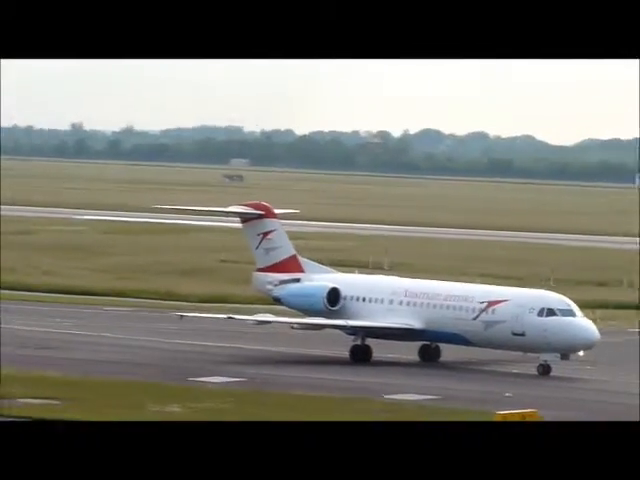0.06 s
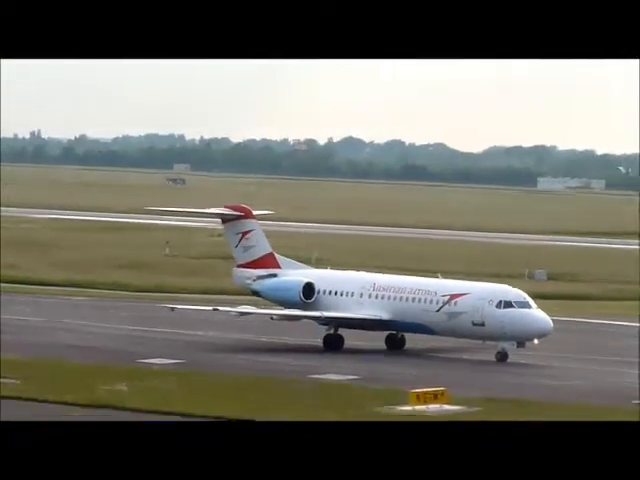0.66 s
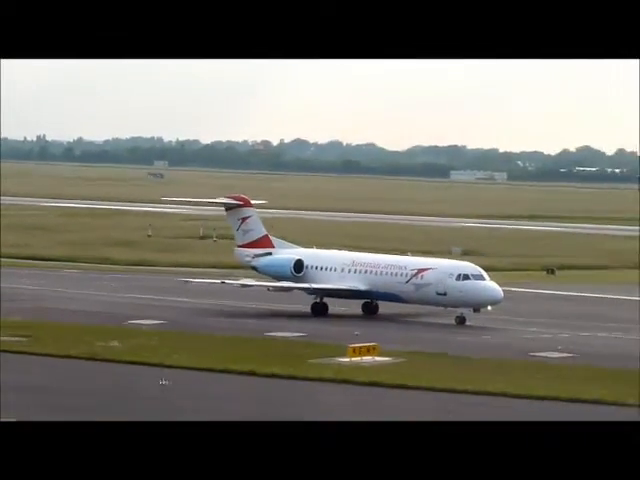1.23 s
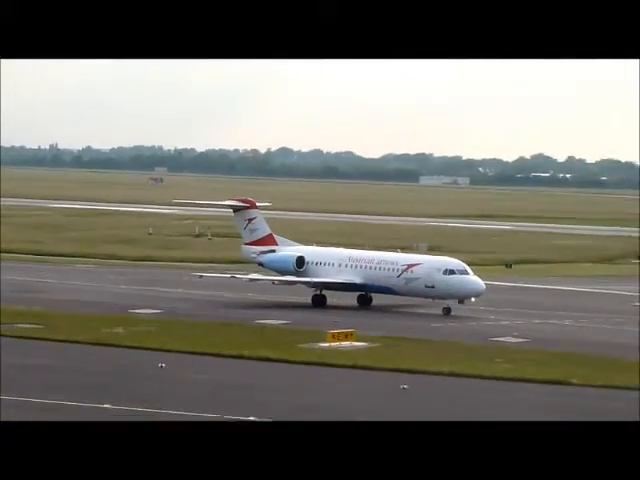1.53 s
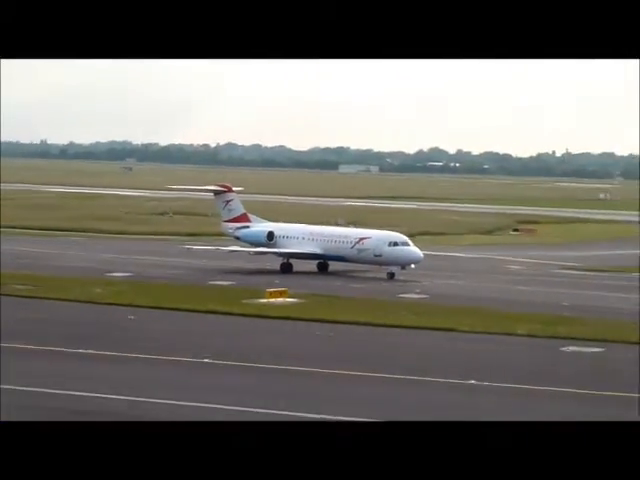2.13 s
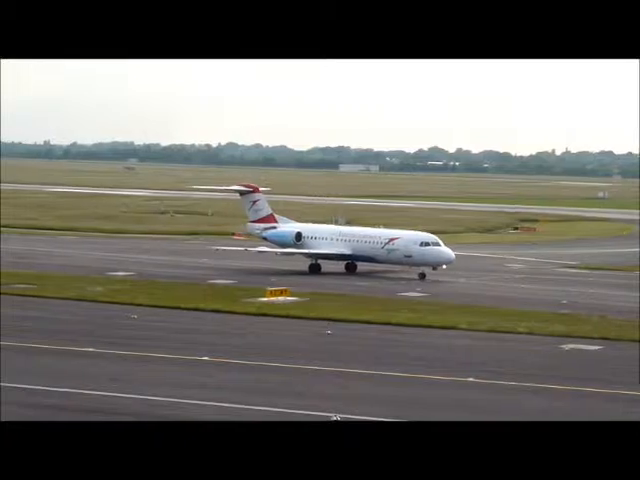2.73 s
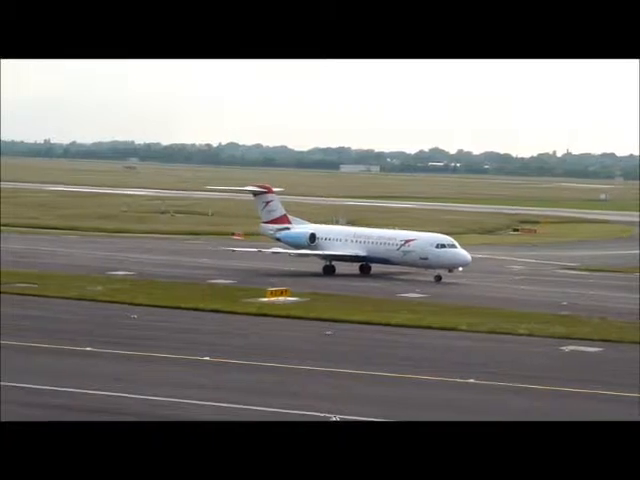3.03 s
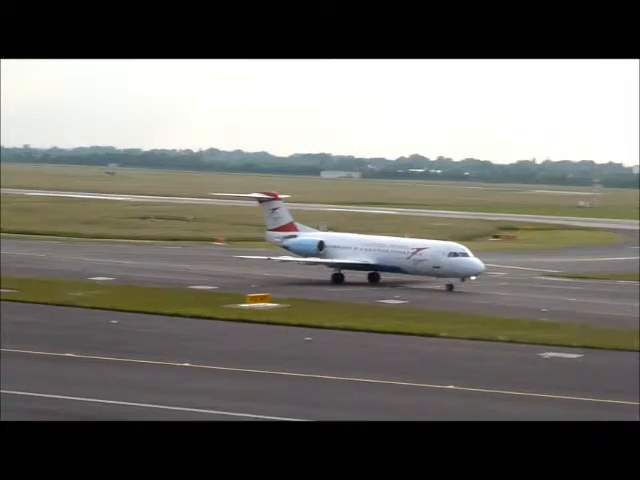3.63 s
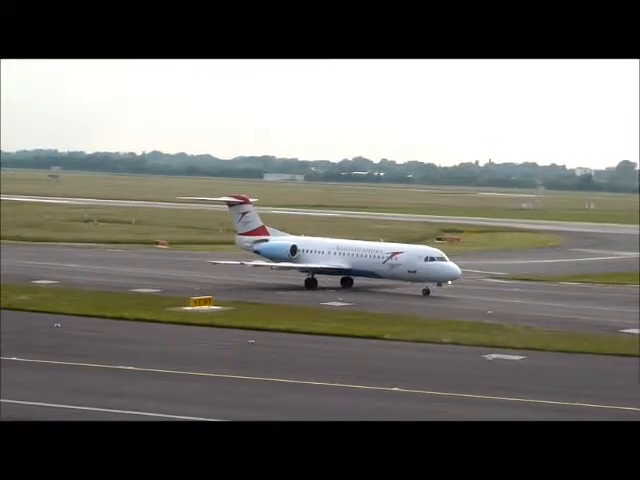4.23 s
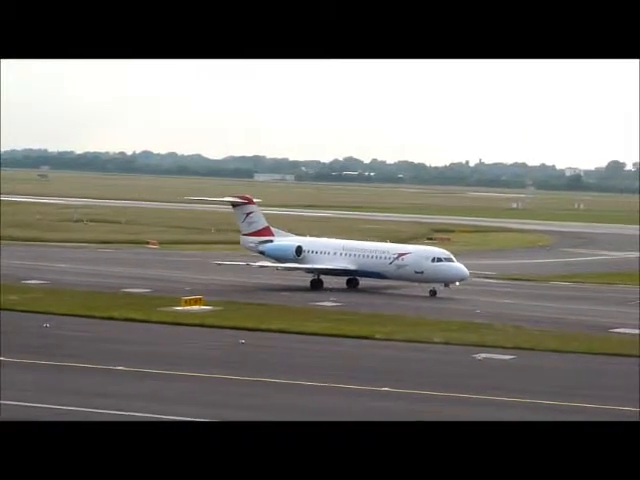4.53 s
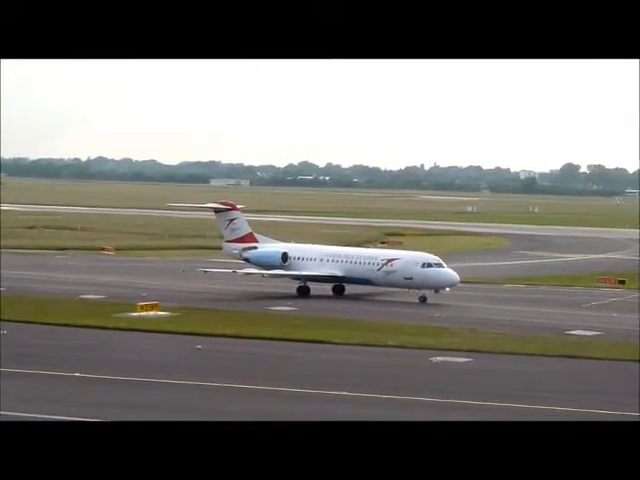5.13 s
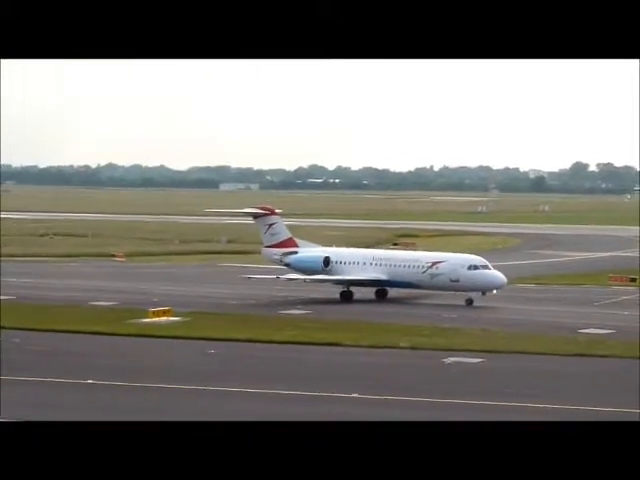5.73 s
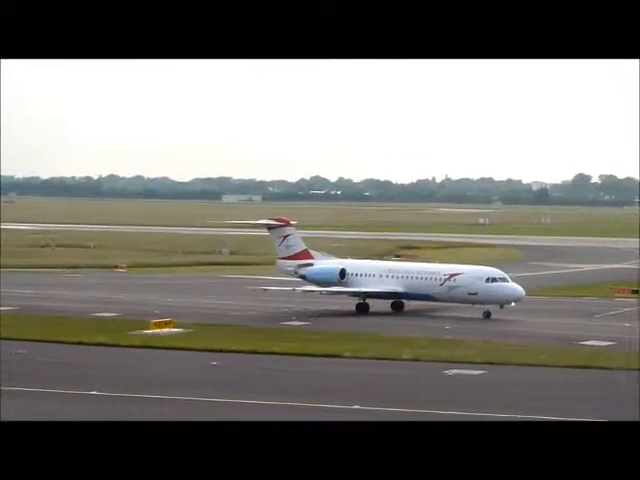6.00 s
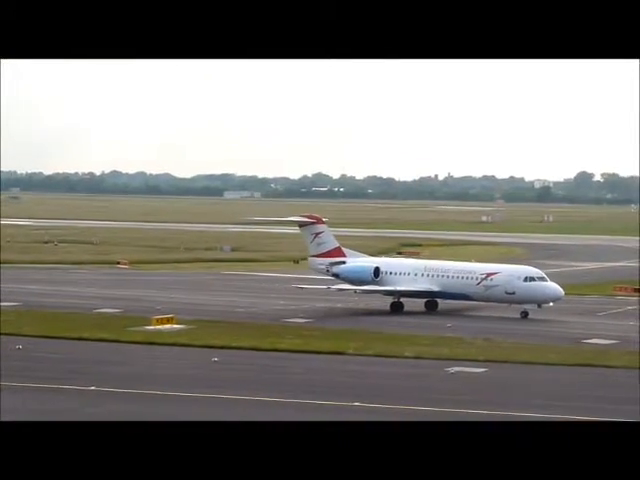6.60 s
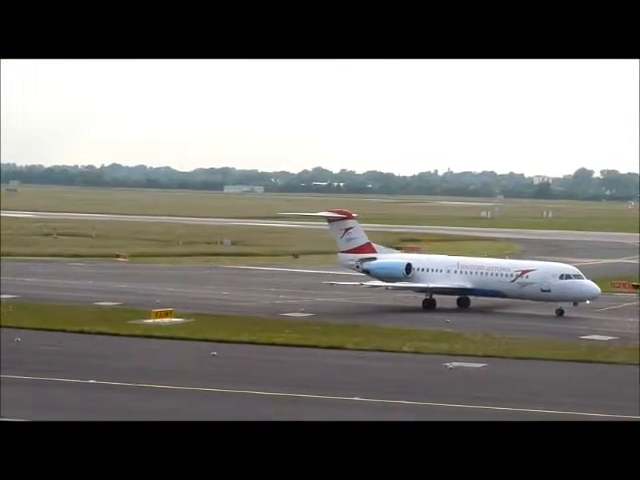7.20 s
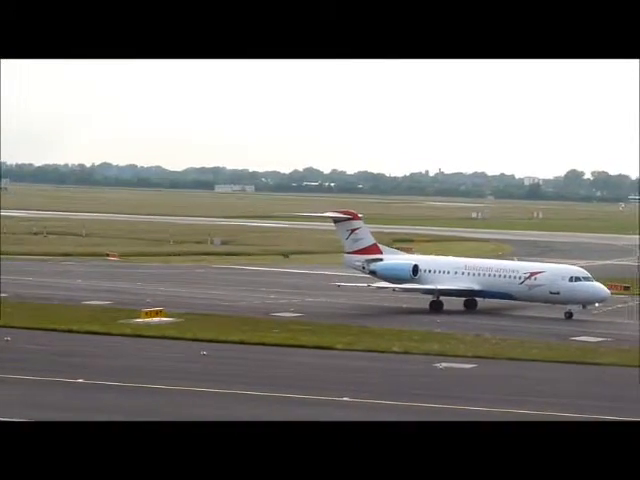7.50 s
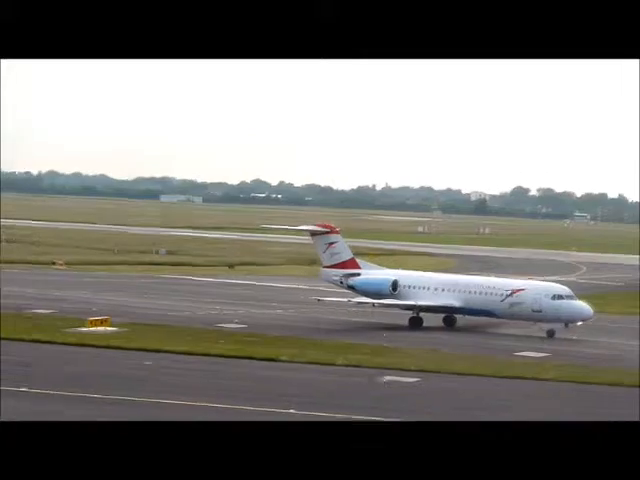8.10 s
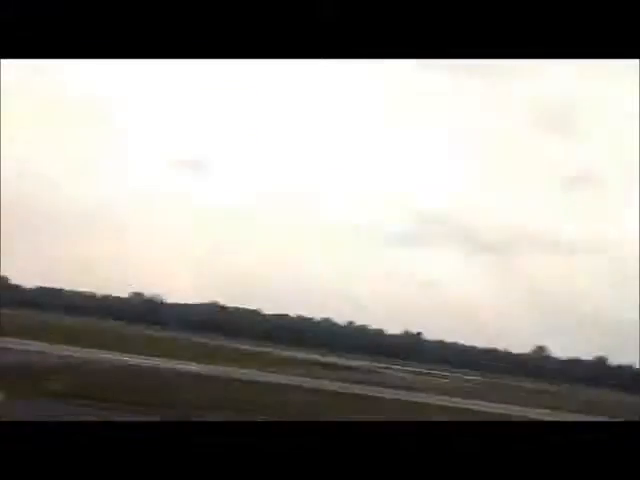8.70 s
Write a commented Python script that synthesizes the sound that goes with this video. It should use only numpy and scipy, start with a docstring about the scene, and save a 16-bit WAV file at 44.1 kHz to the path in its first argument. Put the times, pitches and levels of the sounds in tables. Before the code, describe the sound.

A jet airliner taxis past with a high engine whine and a growing roar over deep rumble, while wind buffets the microphone.

```python
"""A twin-jet airliner taxis past on an open airfield. Its fans whine, sag and slowly spool up,
its compressors whistle, and the exhaust roar grows over a deep rumble as the engines turn towards
the listener. Moving air makes the tones flicker, a reflection combs the roar, and gusts of wind
thump on the microphone."""
import sys
import numpy as np
from scipy import signal
from scipy.fft import rfft, irfft, next_fast_len
from scipy.io import wavfile
from scipy.ndimage import uniform_filter1d, map_coordinates

SR = 44100
rng = np.random.default_rng(int(sys.argv[2]) if len(sys.argv) > 2 else 0)


def to_wav(sig):
    """Store sig (one row per channel, or 1-D mono) as 16-bit WAV at the path in sys.argv[1].

    Samples outside -1..1 are clipped; the rate is SR.
    """
    pcm = np.clip(np.atleast_2d(sig), -1, 1) * 32767
    pcm = np.round(pcm).astype(np.int16)
    wavfile.write(sys.argv[1], SR, pcm.T)  # frames by channels


N = 385875

# the exhaust builds as the engines turn: (time [s], relative level [dB])
ROAR_RIDE = [(0, -36.5), (0.35, -34.5), (1.0, -38), (1.4, -35), (2.5, -31.5), (3.1, -32.5), (4.15, -27.5),
             (4.6, -29.5), (6.8, -30), (8.25, -29), (8.75, -31)]
# the treble swells and sinks through moving air; each layer scales this ride: (time [s], gain [dB])
TREBLE_RIDE = [(0, -2.5), (0.35, -1), (0.97, -9), (1.45, -3.5), (2.5, -1), (2.88, 0.5), (3.1, -2),
               (4.2, 3.5), (4.58, 1.7), (4.85, 4), (5.05, 0), (5.4, 0.5), (5.65, 4), (5.87, -1.5),
               (6.15, -1.5), (6.42, 4.5), (6.78, 0.5), (7.1, 2), (7.7, 0.5), (8.17, 3), (8.75, -1.5)]
HUM_RATIO = 0.3493  # pitch of the fan's low hum over its main tone


def fan():
    """The fan whine: all tones glide with the shaft, each loudest as its beam points at the listener."""
    # upper shaft tones, each with its own lobe:
    # (pitch [x main tone], relative level [dB], lobe centre [s], lobe half-width [s], lobe gain [dB])
    overtones = [(1.1449, -48, 5.5, 2.0, 4.5), (1.3493, -41, 7.2, 1.1, 7), (1.4931, -47, 7.1, 3.6, 11.5),
                 (1.5745, -42, 6.9, 1.0, 8), (1.9242, -46.5, 7.3, 1.6, 11), (2.3512, -45, 6.6, 0.4, 11.5)]
    hz = fan_pitch()
    treble_db, = curves(TREBLE_RIDE)
    past_beam_s = np.arange(N) / SR - 5.45
    beam_db = -26.5 + np.minimum(4.5 * past_beam_s, -3.5 * past_beam_s)  # sweeps in, falls away slower
    stray_db = -43.5 + 1.1 * treble_db  # what is heard outside the beam
    level = np.hypot(amp(beam_db), amp(stray_db))
    whine = level * flaring(hz) * tone(hz, flicker_db=1.26, smear=0.12)
    for ratio, db, centre, width, lobe_db in overtones:
        level = amp(db + 0.35 + lobe_db * swell(centre, width) + 1.15 * treble_db)
        path = flaring(hz * ratio) * fading(depth=0.35, rate=4)
        whine += level * path * tone(hz * ratio, flicker_db=-0.05, smear=0.2)
    return whine


def fan_pitch():
    """The fan's main tone [Hz] sags while the throttle is back, then spools up ever more slowly."""
    start_hz, sag_hz_per_s, sag_s = 1966, 16, 2.0
    spool_at_s, spool_hz, spool_lag_s = 2.62, 103, 5.8
    t = np.arange(N) / SR
    spool = 1 - np.exp(-np.maximum(t - spool_at_s, 0) / spool_lag_s)
    return start_hz - sag_hz_per_s * np.minimum(t, sag_s) + spool_hz * spool


def compressor():
    """Whistles of the fast inner shaft, most spaced by the fan's low hum; each fades on its own path."""
    # the inner shaft's own whistle slowly sinks: (time [s], pitch [Hz])
    core_glide = [(0, 4227), (2, 4229), (5, 4208), (6.5, 4196), (8.75, 4187)]
    # tuning of each whistle: (pitch [x core pitch], upward shift [x low hum pitch])
    tunings = [(1, 0), (1, 1), (1, 2), (1, 3), (1.645, 0)]
    # balance of the same whistles: (relative level at mid-scene [dB], growth [dB/s])
    balance = [(-40.5, 0.3), (-36, 0.28), (-38, 0.32), (-51, 1.2), (-58, -0.1)]
    t = np.arange(N) / SR
    treble_db, = curves(TREBLE_RIDE)
    core_hz, = curves(core_glide)
    hum_hz = HUM_RATIO * fan_pitch()
    whistles = np.zeros(N)
    for (multiple, steps), (db, growth) in zip(tunings, balance):
        hz = multiple * core_hz + steps * hum_hz
        level = amp(db + growth * (t - t.mean()))
        path = flaring(hz) * fading(depth=0.38, rate=4)
        whistles += level * path * tone(hz, flicker_db=1.06, smear=0.3)
    return amp(0.55 * treble_db - 0.5) * whistles


def jet():
    """Exhaust, rush and hiss of the engines, combed by a reflection whose path keeps changing."""
    # colour of the airy rush: (frequency [Hz], relative level [dB])
    rush_colour = [(1300, -36.5), (1700, -5.5), (2200, 1), (3200, 1), (3600, 0.5), (4100, -0.5), (4600, -3),
                   (5200, -30)]
    # colour of the hiss above it: (frequency [Hz], relative level [dB])
    hiss_colour = [(3900, -20.5), (4700, -2), (5300, -2.5), (5750, -8), (6200, -9), (6600, -16),
                   (7000, -22.5), (7400, -31.5), (7700, -41.5)]
    # bounce off a nearby surface: (time [s], delay [ms], strength [x direct sound])
    bounce = [(0, 1.43, 0), (1.8, 1.44, 0.2), (1.95, 1.0, 0), (2.15, 1.05, 0.24), (3.1, 1.1, 0.33),
              (3.3, 0.97, 0.09), (4.7, .97, 0.16), (5.5, 0.97, 0.1), (5.75, 1.43, 0.3), (6.45, 1.344, 0.4),
              (8.1, 1.2, 0.18), (8.75, 1.25, 0.1)]
    roar_db, = curves(ROAR_RIDE)
    treble_db, = curves(TREBLE_RIDE)
    flutter = wobble(13)
    rush = amp(-29.5 + treble_db + 0.72 * flutter) * patchy(noise(rush_colour), depth_db=0.68)
    duck_db = 0.35 * (roar_db - roar_db.mean())  # the hiss gives way to the roar
    hiss_db = -37 + 1.3 * treble_db - duck_db + 1.5 * flutter
    hiss = amp(hiss_db) * patchy(noise(hiss_colour), depth_db=2.5)
    direct = exhaust(roar_db) + rush + hiss
    delay_ms, strength = curves(bounce)
    reflected = map_coordinates(direct, [np.arange(N) - delay_ms * SR / 1000], order=1)
    return (direct + strength * reflected) / np.hypot(1, strength)


def exhaust(roar_db):
    """Turbulent roar, burner noise ringing in the jet pipe, and two rough hums that follow the shaft."""
    # colour of the roar: (frequency [Hz], relative level [dB])
    roar_colour = [(230, -20.5), (400, -3.5), (560, -0.5), (880, -2), (1020, -1.5), (1170, -4.5), (1390, 0),
                   (1800, -6), (2400, -31.5)]
    # hollow resonances of the jet pipe: (frequency [Hz], bandwidth [Hz], relative level [dB])
    pipe_modes = [(671.5, 73, 2.5), (809, 45, -4.5), (965, 50, -13.5), (1397, 57, -3.5)]

    def pipe(hz):
        """The pipe's response: band-pass resonances of alternating polarity."""
        return sum((-1) ** k * amp(db) * 1j * hz * width / (centre ** 2 - hz ** 2 + 1j * hz * width)
                   for k, (centre, width, db) in enumerate(pipe_modes))

    t, fan_hz = np.arange(N) / SR, fan_pitch()
    howl = unit(filtered(rng.standard_normal(N), pipe)) * amp(-2.5 + 1.8 * wobble(12))
    low_hum = amp(-7.5) * tone(HUM_RATIO * fan_hz, flicker_db=2.1, smear=2.6)
    high_hum = amp(-11.5 + 0.5 * (t - t.mean())) * tone(0.524 * fan_hz, flicker_db=2.0, smear=0.78)
    roar = patchy(noise(roar_colour), depth_db=0.5)
    return amp(roar_db - 1.9) * (howl + low_hum + high_hum + roar)


def rumble():
    """The deep mixing noise of the jets, growing a little with the exhaust."""
    # colour of the low end: (frequency [Hz], relative level [dB])
    rumble_colour = [(20, -24), (35, -10), (60, -1.5), (100, -1.5), (150, 0.5), (250, -10.5), (400, -13.5),
                     (600, -30)]
    roar_db, = curves(ROAR_RIDE)
    return amp(-34 + 0.19 * (roar_db - roar_db.mean()) + 2.7 * wobble(7.3)) * noise(rumble_colour)


def wind():
    """Wind on the microphone: lumpy buffeting, brighter flapping in sharp gusts, and thumping eddies."""
    # colour of the low buffeting: (frequency [Hz], relative level [dB])
    buffet_colour = [(20, -22), (40, -8), (75, 1.5), (140, -2), (230, -8), (400, -22), (700, -30)]
    # colour of the flapping: (frequency [Hz], relative level [dB])
    flap_colour = [(70, -17), (150, -2), (260, -0.5), (420, -9), (650, -17), (1300, -39.5)]
    # gusts and lulls: (time [s], half-width [s], buffeting gain [dB], flapping gain [dB])
    gusts = [(0.2, 0.035, 7, 11), (0.56, 0.16, 5.5, 14.5), (0.82, .06, 6.5, 17), (1.03, 0.12, 6.5, 14),
             (1.35, 0.079, -6, -1), (1.8, .07, 6.5, 5), (2.06, 0.042, 11.5, 11), (2.45, 0.21, 3, 5.5),
             (2.95, 0.05, 7, 17), (3.2, 0.12, -7, -1), (3.72, 0.44, 1, 0.5), (4.45, 0.11, 3, 7),
             (4.85, 0.25, -5, -5), (5.25, 0.14, 2.5, -1), (6.04, 0.029, 7, 17), (7.3, .08, 6.5, 0),
             (8.4, .5, -1.5, 3)]
    # single eddies hitting the microphone: (time [s], relative level [dB], time scale [s])
    eddies = [(0.195, -19, 0.004), (0.205, -15.5, 0.0021), (0.464, -15.5, 0.0022), (0.518, -16, 0.0018),
              (0.597, -9.5, 0.0017), (.651, -18, 0.0028), (0.691, -17, 0.00224), (0.75, -11, 0.0022),
              (0.825, -7, 0.00098), (.834, -15, 0.002), (0.9, -15.5, 0.002), (.962, -13, 0.00154),
              (1.069, -12.5, 0.0019), (1.092, -15.5, 0.0013), (1.512, -17.5, 0.0028), (1.693, -15.5, .0045),
              (2.065, -15, 0.0028), (2.52, -16.5, 0.0026), (2.934, -14.5, 0.0037), (6.035, -13, 0.0026)]
    t = np.arange(N) / SR
    buffet_db = -34.5 + sum(db * swell(at, width) for at, width, db, _ in gusts)
    flap_db = -47 + sum(db * swell(at, width) for at, width, _, db in gusts)
    buffet = amp(buffet_db) * unit(amp(3.5 * wobble(35)) * noise(buffet_colour))
    flapping = amp(flap_db) * unit(amp(4.2 * wobble(70)) * noise(flap_colour))
    thumps = np.zeros(N)
    for at, db, scale in eddies:
        u = (t - at) / scale
        thumps += amp(db + 2.5) * np.sin(2.7 * u) * np.exp(-0.9 * abs(u))  # one steep pressure swing
    dying_breeze = amp(-0.18 * t)
    return dying_breeze * (buffet + flapping) + thumps


def tone(hz, flicker_db, smear):
    """A blade tone in moving air: its level flickers, and scattered sound (smear) beats against it."""
    scatter = wobble(22) + 1j * wobble(22) + 0.48 * (wobble(70) + 1j * wobble(70))
    wave = (1 + smear * scatter) * np.exp(2j * np.pi * np.cumsum(hz) / SR)
    return unit(amp(flicker_db * wobble(20)) * wave.real)


def flaring(hz):
    """Gain of the tone at this pitch as the air carries it well or badly."""
    # flat-topped flares and dropouts of single tones: (time [s], half-width [s], pitch [Hz], gain [dB])
    flares = [(0.3, .3, 4220, 5.5), (0.3, 0.67, 4900, 4.5), (0.3, .3, 1970, 4), (0.9, .08, 1970, -8),
              (1.5, .32, 4900, 5), (1.75, 0.38, 1970, -7), (1.9, .25, 4220, 7), (1.9, 0.047, 5580, -7),
              (2.05, 0.2, 4900, 5), (2.2, 0.092, 1970, 3.5), (2.2, .14, 5580, 9), (2.5, 0.22, 4900, -8),
              (2.8, 0.17, 6270, 9), (2.84, 0.25, 5580, 8), (2.88, 0.16, 3750, 8), (3.3, 0.067, 1970, 3.5),
              (3.5, 0.28, 4900, 6.5), (3.55, 0.15, 5580, 2.5), (3.55, .2, 6270, 9.5), (4.2, .25, 2650, 6.5),
              (4.2, .25, 4620, 3.5), (4.6, .12, 1970, -5), (4.65, 0.41, 6270, 11), (4.7, .18, 2650, 7),
              (4.1, 0.23, 5580, -4), (5.05, .3, 5580, -5), (5.6, 0.15, 1970, -2.5), (1.08, 0.078, 4900, -4),
              (5.08, .13, 4900, 7.5), (5.3, 0.06, 1970, 3), (5.38, 0.1, 4900, 9.5), (5.84, .12, 1970, 6),
              (6.4, 0.35, 5580, -8), (6.85, 0.094, 1970, -7), (7.2, .3, 6900, 9), (7.25, .1, 4900, -21),
              (7.3, .9, 4220, 4), (7.5, .06, 1970, -13), (7.68, 0.23, 5580, 7), (7.8, 0.18, 1970, 3.5),
              (8.2, .08, 1970, -10), (8.2, .25, 6270, 6.5), (8.25, .35, 5580, 5.5), (8.5, .1, 2700, 8.5),
              (8.63, .08, 4900, 8.5), (8.64, .08, 5580, 10.5)]
    t = np.arange(N) / SR
    own = [(at, width, db) for at, width, pitch, db in flares if abs(pitch / hz.mean() - 1) < 0.03]
    return amp(sum(db * np.exp(-abs((t - at) / width) ** 3) for at, width, db in own))


def fading(depth, rate):
    """Gain of a tone meeting its own reflection at a wandering phase: it holds, dips and returns."""
    return unit(abs(1 + depth * np.exp(2j * wobble(rate))))


def patchy(x, depth_db):
    """Turbulent air lifts and drops patches of the spectrum."""
    spectra = signal.stft(x, nperseg=512)[2]
    patches = uniform_filter1d(rng.standard_normal(spectra.shape), size=9, axis=0)  # across frequency
    patches = uniform_filter1d(patches, size=22, axis=1)  # across time
    return unit(signal.istft(spectra * amp(depth_db * unit(patches)), nperseg=512)[1][:N])


def noise(colour):
    """Noise of rms 1, coloured by (frequency [Hz], level [dB]) points."""
    points_hz, db = np.transpose(colour)
    response = lambda hz: amp(np.interp(np.log(hz + 1), np.log(points_hz), db, left=-120, right=-120))
    return unit(filtered(rng.standard_normal(N), response))


def filtered(x, response):
    """x shaped by a response, given as a function of frequency."""
    size = next_fast_len(N + SR // 2)
    return irfft(rfft(x, size) * response(np.fft.rfftfreq(size, 1 / SR)), size)[:N]


def swell(centre, width):
    """A bell of height 1 in time."""
    return np.exp(-((np.arange(N) / SR - centre) / width) ** 2)


def wobble(rate):
    """A smooth random curve, rate knots a second."""
    return map_coordinates(rng.standard_normal(int(N * rate / SR) + 4), [np.arange(N) * rate / SR])


def curves(rows):
    """One automation curve for each column after the time."""
    times, *columns = np.transpose(rows)
    return [np.interp(np.arange(N) / SR, times, column) for column in columns]


def amp(db):
    """Decibels to linear gain."""
    return 10 ** (np.asarray(db) / 20)


def unit(x):
    """x scaled to rms 1."""
    return x / np.sqrt(np.mean(x ** 2) + 1e-20)


def scene():
    """The airliner and the wind, mixed in mono."""
    return (fan() + compressor() + jet() + rumble() + wind())[None]


def record(dry):
    """A brick-wall low-pass takes off the top end."""
    cutoff_hz = 7725
    return filtered(dry[0], lambda hz: hz < cutoff_hz)[None]


dry = scene()
out = record(dry)
to_wav(out)
```